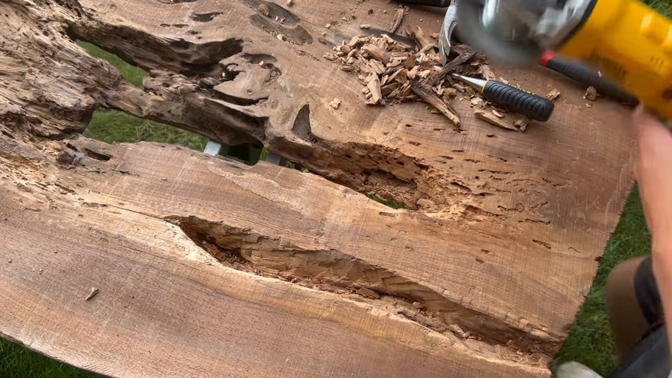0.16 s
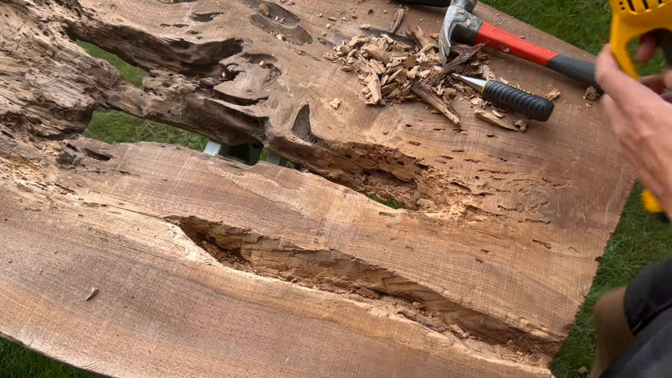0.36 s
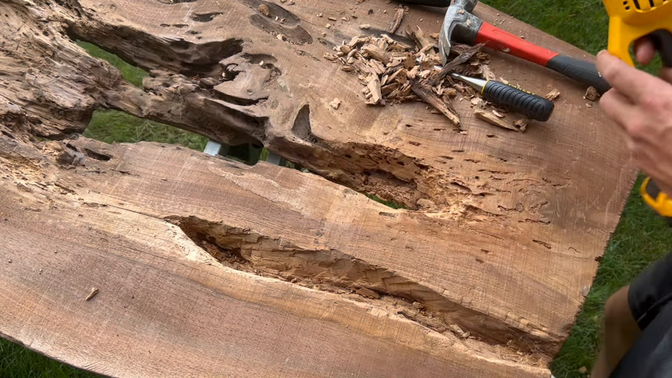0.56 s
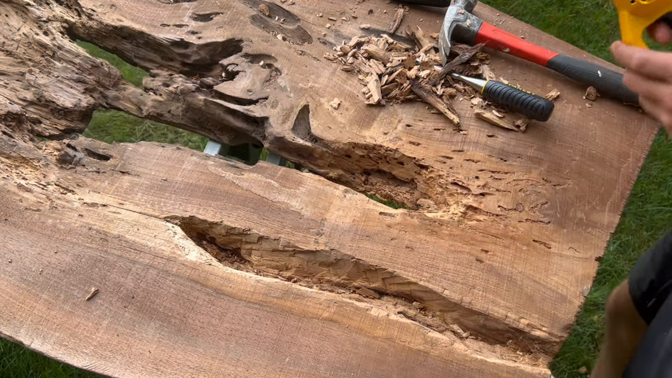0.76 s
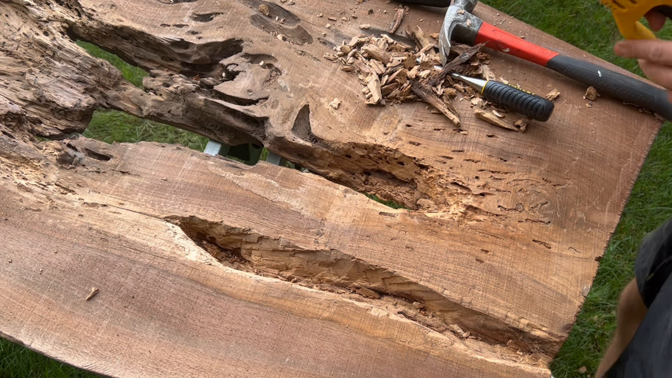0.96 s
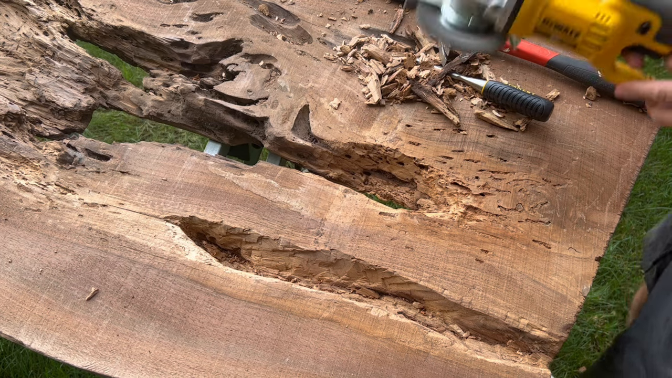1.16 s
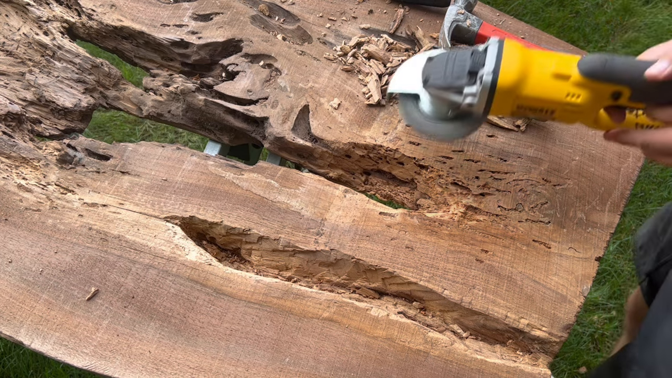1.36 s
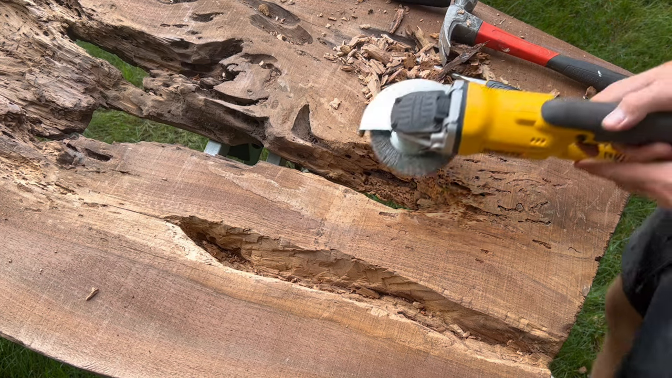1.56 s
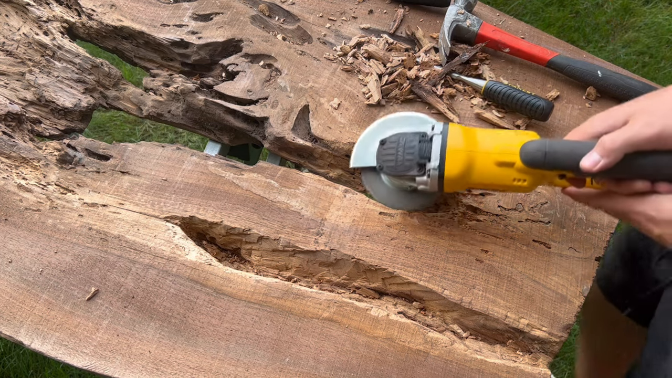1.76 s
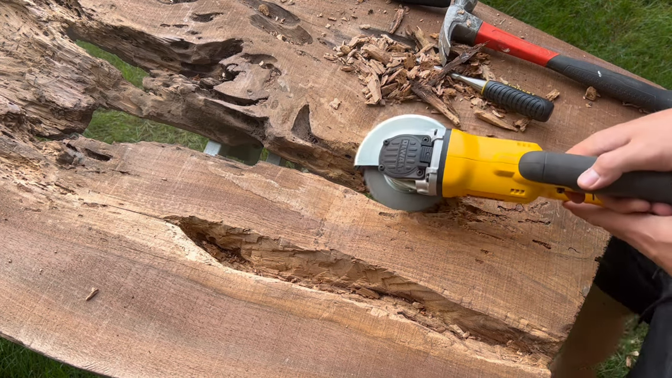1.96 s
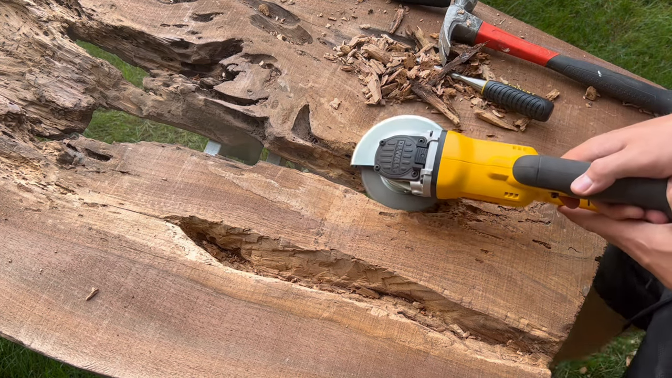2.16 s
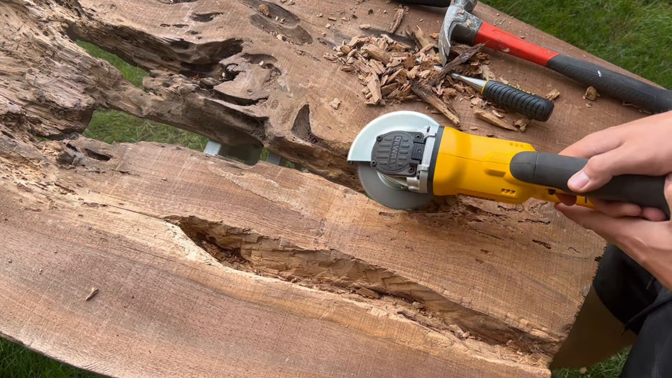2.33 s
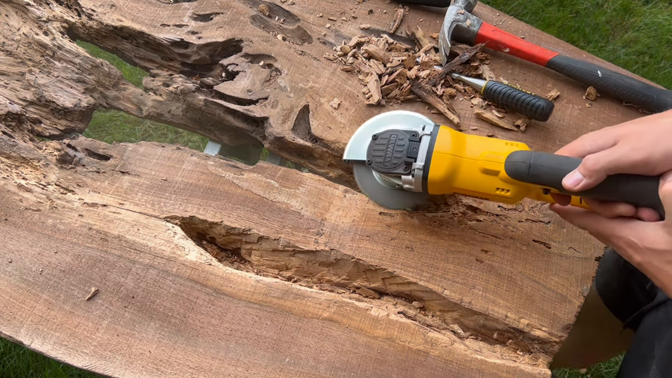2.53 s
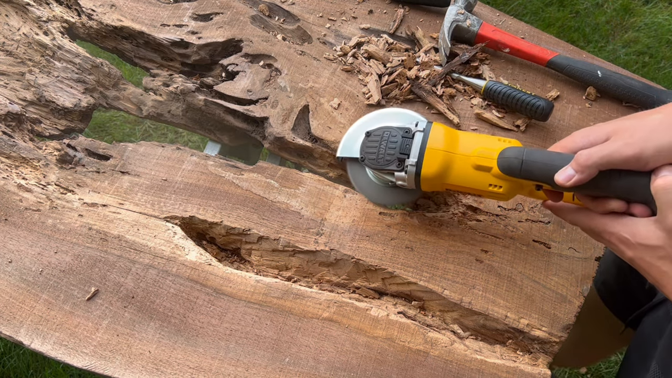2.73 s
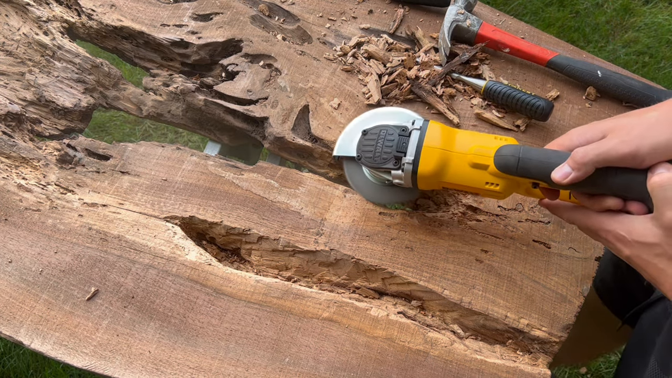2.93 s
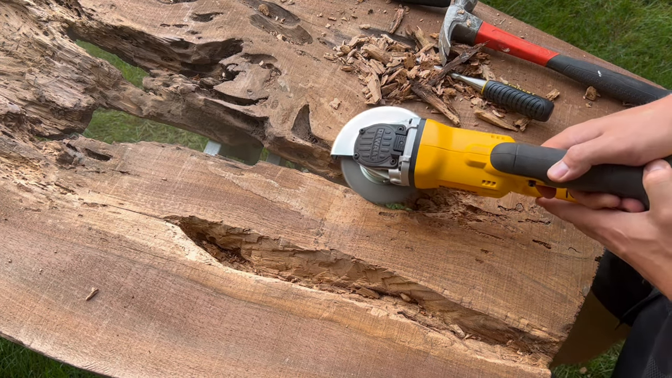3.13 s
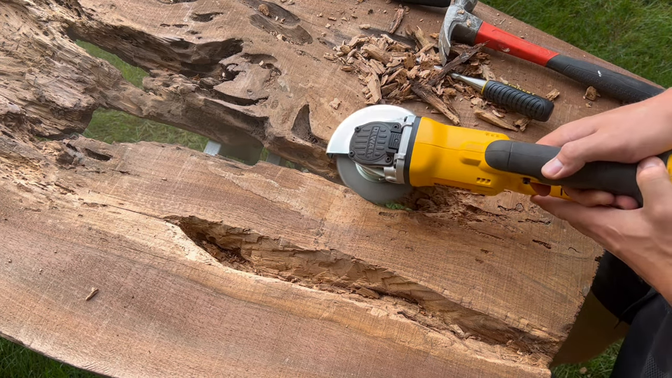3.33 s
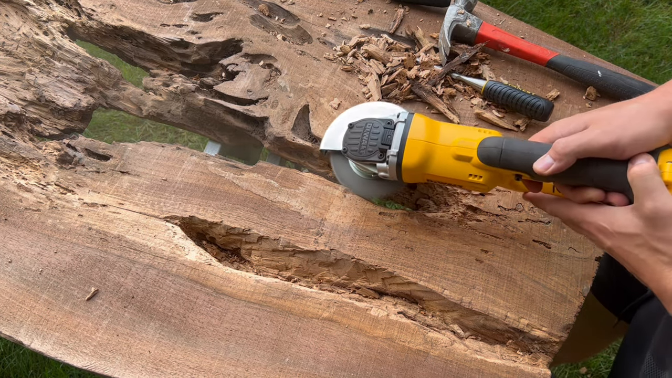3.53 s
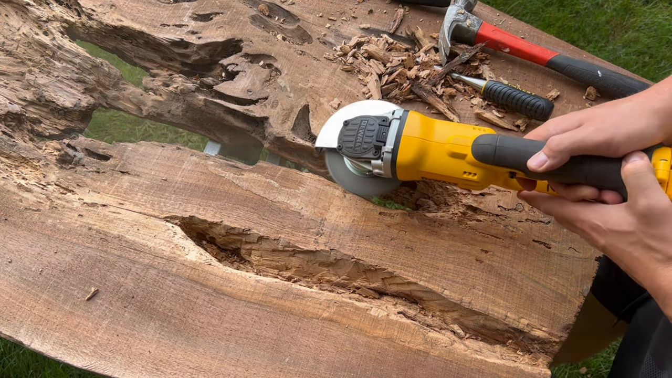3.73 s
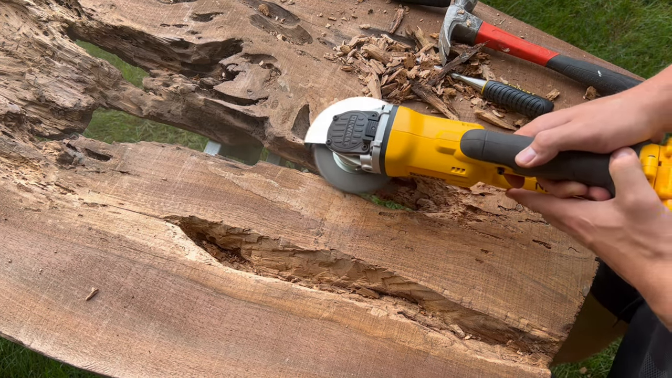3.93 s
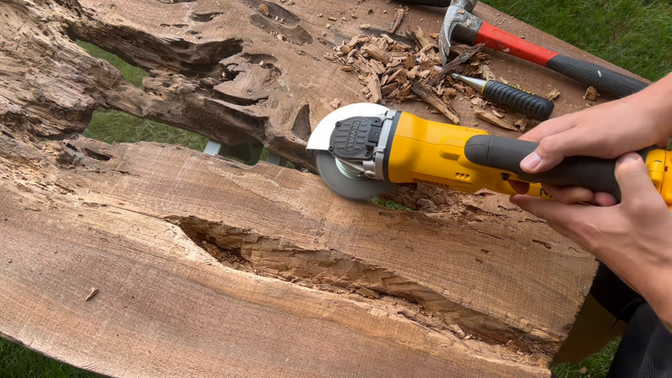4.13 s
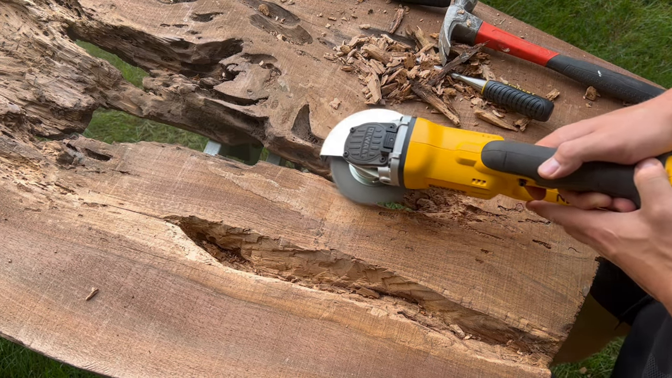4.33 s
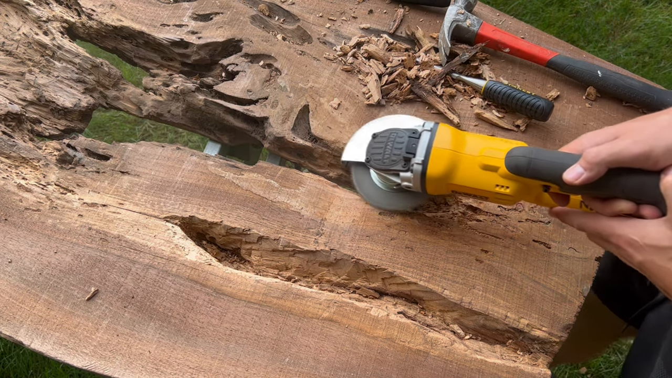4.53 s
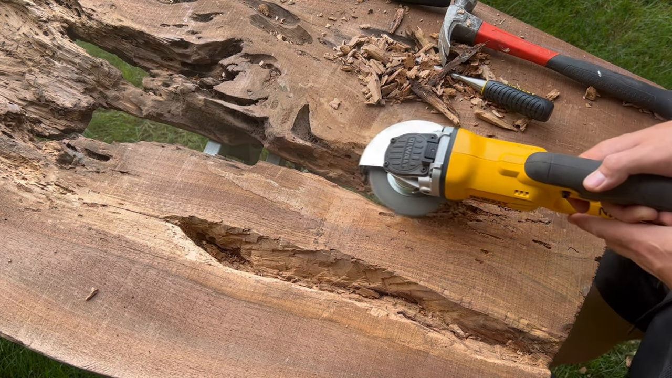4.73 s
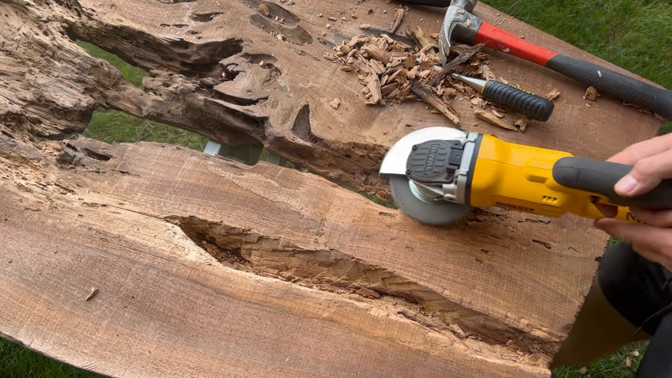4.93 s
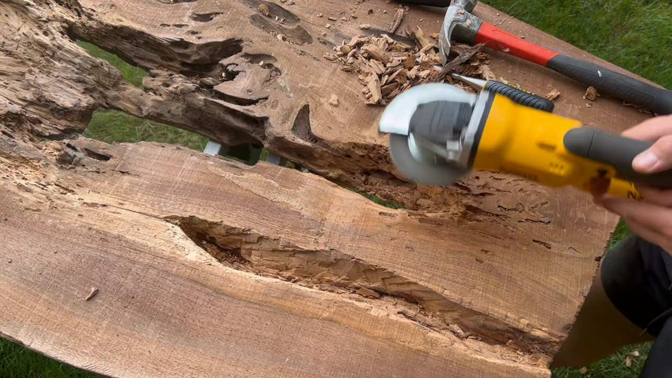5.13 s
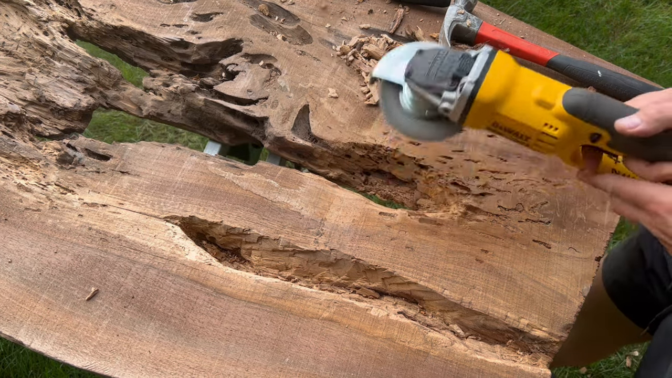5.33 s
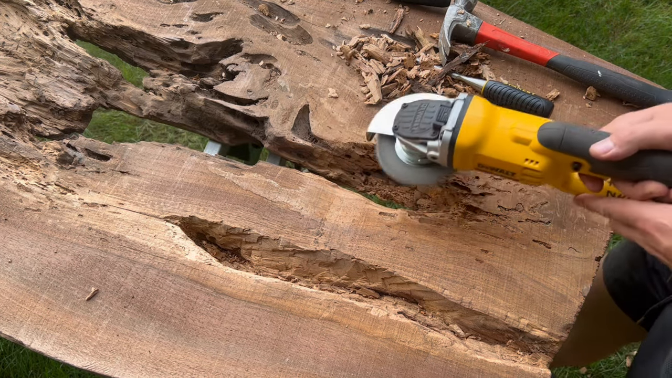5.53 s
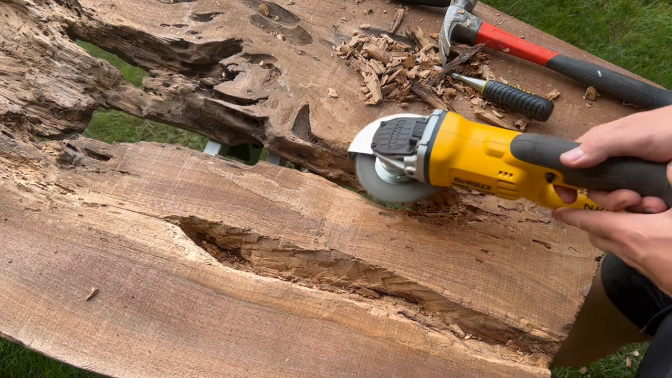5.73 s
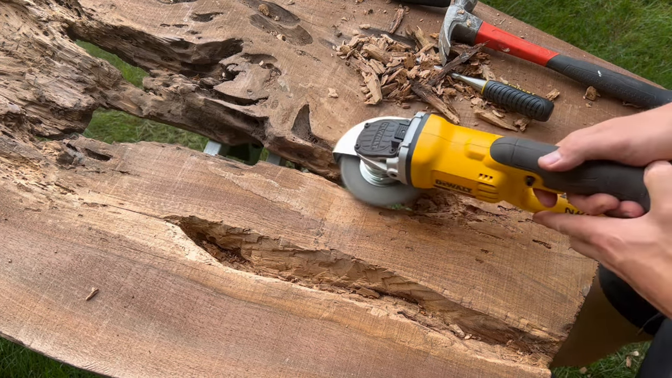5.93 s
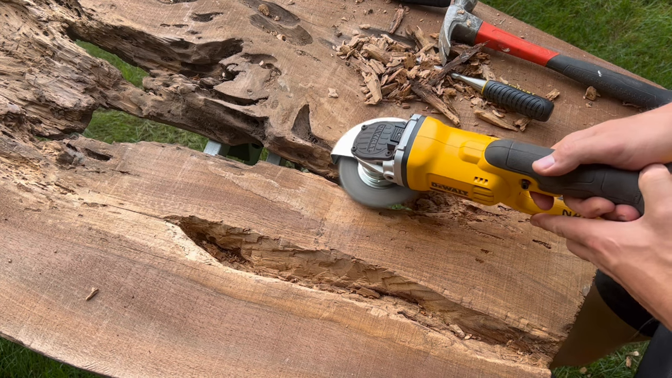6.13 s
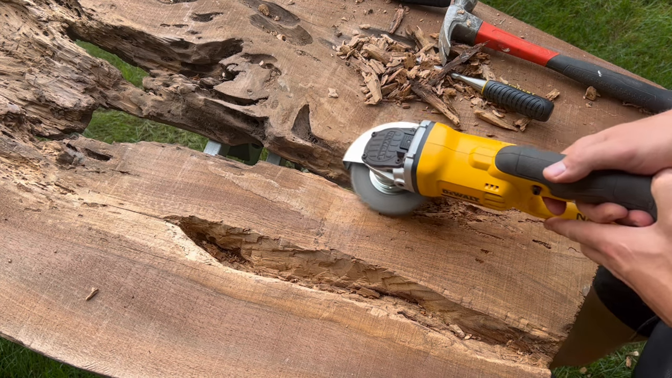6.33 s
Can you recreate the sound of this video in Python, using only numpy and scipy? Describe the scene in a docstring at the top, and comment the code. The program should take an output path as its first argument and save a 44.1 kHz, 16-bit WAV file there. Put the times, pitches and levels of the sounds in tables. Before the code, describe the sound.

A close, dry outdoor stereo pickup with an almost silent garden behind. From 0 to 0.33 s an angle grinder runs freely with a high whine, low hum and airy hiss. The trigger is released and the pitch glides down, gears knocking and rattling unevenly, fading out towards 1.5 s; soft low gusts of air thump the microphone around 0.75-1 s, strongest near 0.87. At 1.62-1.65 s a plastic trigger clicks, and the motor growls up to full whine within about 0.3 s. From 1.9 s it grinds soft wood: throaty roar, gear clatter, hiss and slab rumble, pitch sagging unevenly, deeper near 3.7 s, recovering by 4.2. Around 4.7-5 s a deep bite drags the pitch down with a bright tearing rasp, a brief growl and a final tick. Released at 5.17 s, it winds down with knocks, surges again at 5.53 and runs on to the end at about 6.4 s.

```python
"""Outdoors in a quiet garden, a cordless angle grinder works close to two microphone ports.
It coasts to a stop, its cooling air buffeting the microphone; the trigger clicks and it spins up again,
carves soft rotten wood, sags as the disc bites, is let go for a moment and runs on.
Shaft-locked sines make the whines; filtered noise makes clatter, roar, hiss and rumble;
enveloped bursts make the gear knocks, clicks and gusts. All machine voices follow one motor model."""
import sys
import numpy as np
from scipy import signal
from scipy.fft import rfft, irfft
from scipy.io import wavfile
from scipy.ndimage import uniform_filter1d

SR = 44100
rng = np.random.default_rng(int(sys.argv[2]) if len(sys.argv) > 2 else 0)


def dump(signal):
    """Clip the signal to [-1, 1] and save it as 16-bit WAV at the path in sys.argv[1]."""
    limited = np.clip(np.atleast_2d(signal).T, -1, 1)
    pcm = np.round(limited * 32767).astype(np.int16)
    wavfile.write(sys.argv[1], SR, pcm)


N = 281799
TIME, BINS = np.arange(N) / SR, np.fft.rfftfreq(N, 1 / SR)


def amp(db):
    """Logarithmic level: decibels to amplitude gain."""
    return 10 ** (np.asarray(db) / 20)


def unit(x):
    """Normalisation: scales to rms 1."""
    return x / np.sqrt(np.mean(x ** 2) + 1e-20)


def curve(rows, outside=None):
    """Linear interpolation: a time table, at every sample."""
    return np.interp(TIME, *np.transpose(rows), outside, outside)


def read(points, hz=BINS):
    """Interpolation of a spectrum table on a logarithmic frequency axis."""
    f, value = np.transpose(points)
    return np.interp(np.log(hz + 1), np.log(f), value)


def colour(x, db):
    """Spectral filtering: a gain in dB for every bin, then rms 1."""
    return unit(irfft(rfft(x) * amp(db), N))


def noise():
    """White noise: equal power per hertz."""
    return rng.standard_normal(N)


def wander(hz):
    """Band-limited chance: slow random motion up to about hz; rms 1."""
    points = rng.standard_normal(int(2 * hz * N / SR) + 2)
    return unit(np.interp(TIME * 2 * hz, np.arange(len(points)), points))


def resonate(x, hz, width):
    """Heterodyne resonance: shifts hz to zero, smooths with two poles and shifts back."""
    turn = np.exp(2j * np.pi * np.cumsum(hz) / SR)
    r = np.exp(-np.pi * width / SR)
    smoothed = signal.lfilter([(1 - r) ** 2], [1, -2 * r, r * r], x / turn + 1e-18)
    return 2 * (turn * smoothed).real


def add(mix, s, sound):
    """Superposition: mixes a sound in at time s."""
    part = mix[round(s * SR):][:len(sound)]
    part += sound[:len(part)]


def swell(s, hold_s, rise_db_per_s, fall_db_per_s):
    """Exponential growth and decay: an envelope in dB that rises to 0 at time s, holds, and falls."""
    rise = -rise_db_per_s * np.maximum(s - TIME, 0)
    return rise - fall_db_per_s * np.maximum(TIME - s - hold_s, 0)


def lift(hz, centre, width, db):
    """Resonance curve: the gain in dB at the frequencies hz."""
    return db / (1 + (2 * (hz - centre) / width) ** 2)


# the trigger is held: (start [s], end [s])
RUNS = [(-1, .33), (1.655, 5.17), (5.528, 7)]
# pressure on the wood: (time [s], motor speed lost [turns/s])
SAG = [(1.8, 0), (1.9, 10), (2.11, 13.5), (2.22, 19.5), (2.37, 9.5), (2.5, 20), (2.62, 16), (2.8, 24.5),
       (3.03, 28), (3.54, 29.5), (3.74, 34.5), (3.88, 20.5), (4.2, 12), (4.68, 22), (4.8, 47.5), (4.98, 33),
       (5.16, 3), (6.25, 2), (6.39, 14)]
FREE_HZ, SPIN_UP_S = 388.5, .099  # free speed in turns per second, and time constant of the climb
FRICTION_HZ_PER_S, DRAG_S = 280, 3.7  # bearings and air brake the coasting rotor
UNLOAD_S = 0.17  # time constant: the gears go slack after the trigger is let go


def motor():
    """Rotor inertia: speed climbs exponentially under power, coasts against friction and drag, sags under load."""
    speed, power = np.zeros(N), np.zeros(N)
    brake = FRICTION_HZ_PER_S * DRAG_S
    for on, off in RUNS:
        driven = np.clip(TIME - on, 0, off - on)
        coasted = np.maximum(TIME - off, 0)
        speed_at_start = np.interp(on, TIME, speed)
        climb = FREE_HZ - (FREE_HZ - speed_at_start) * np.exp(-driven / SPIN_UP_S)
        coasting = (climb + brake) * np.exp(-coasted / DRAG_S) - brake
        speed = np.where(TIME < on, speed, coasting)
        power = np.where(TIME < on, power, np.exp(-coasted / UNLOAD_S))
    return np.maximum(speed - curve(SAG), 0), uniform_filter1d(power, size=500)


HARD_PULL_HZ_PER_S = 940  # acceleration that strains the gears


def pull(speed):
    """Angular acceleration as a share of a hard pull; negative while slowing."""
    return uniform_filter1d(np.gradient(speed) * SR, size=400) / HARD_PULL_HZ_PER_S


FULL_LOAD_HZ = 20  # sag that counts as a firm cut
TILT_S, TILT_TAKES_S = 3.76, 0.06  # the grip shifts and the tool stays tilted into the hollow
AWAY_S, AWAY_WIDTH_S, AWAY_DB = 0.65, 0.56, -3  # the tool is swung aside while it coasts


def level(law, speed, power):
    """Power law of speed, in dB, plus the effects of power, load, hard pull and tilt.

    A law is (dB at free speed, dB per doubling of speed, dB added by power, load, hard pull, tilt).
    """
    # power stirs the gears even from rest
    doublings = np.log2(np.maximum(speed / FREE_HZ, 0.22 * power) + 1e-9)
    load = np.tanh(curve(SAG) / FULL_LOAD_HZ)
    strain = np.clip(pull(speed), 0, 1) ** 2
    tilt = np.clip((TIME - TILT_S) / TILT_TAKES_S + .5, 0, 1)
    away_db = AWAY_DB * np.exp(-((TIME - AWAY_S) / AWAY_WIDTH_S) ** 2)
    return law[0] + np.dot(law[1:], [doublings, power, load, strain, tilt]) + away_db


# housing resonances and one dip: (frequency [Hz], width [Hz], lift [dB])
HOUSING = [(2280, 420, 6), (2600, 200, 7), (2810, 170, -9), (3080, 90, 4), (3430, 70, 5), (3715, 160, 5),
           (5980, 110, 6)]


def housing(hz):
    """Forced resonance: the lift in dB that the housing gives a tone sweeping through hz."""
    return sum(lift(hz, *row) for row in HOUSING)


def partials(turns, orders, waver_db, waver_hz, slip):
    """Order locking: lines at multiples of shaft speed waver in level and phase; high ones need speed."""
    out = np.zeros(N)
    speed = np.gradient(turns) * SR
    pace = np.clip(speed / 360, 0, 1)
    for multiple, db in orders:
        multiple = round(multiple * 32) / 32  # the gear ratio is in 32nds
        phase = 2 * np.pi * (multiple * turns + rng.random()) + slip * wander(waver_hz)
        reach = pace ** (4 * (multiple > 12))
        gain = amp(db + housing(multiple * speed) + waver_db * wander(waver_hz))
        out += reach * gain * np.sqrt(2) * np.sin(phase)
    return out


GEAR_RATIO = 9 / 32  # disc turns per motor turn
# rotor hum, with disc sidebands between whole multiples: (multiple of motor speed [1], relative level [dB])
HUM_ORDERS = [(.84, -17), (1, 0), (1.25, -20), (1.28, -13.5), (1.41, -12.5), (1.44, -17), (1.56, -17.5),
              (1.97, -17), (2.25, -13), (2.38, -15), (2.84, -17.5), (5, -13)]
# gear mesh: (multiple of motor speed [1], relative level [dB])
MESH_ORDERS = [(8, -6), (8.72, -9), (9, -.5), (17.44, -9), (18, -4)]
# change in the gear whine: (time [s], added level [dB])
MESH_SWELL = [(1.79, -9), (1.85, -4), (1.89, -14), (2.15, -3), (3.2, -1.5), (4, 1.5), (4.9, 3), (5.2, -10),
              (5.6, -13), (6.1, -9), (6.39, -3)]
# fan blades: (multiple of motor speed [1], relative level [dB])
FAN_ORDERS = [(7, -14), (8, -12), (10, -.5), (12, -9), (19, -4), (19.12, -10), (20, -4.5), (30, -7)]
HUM_LAW = (-58.5, 25, 0, 7, 4.5, -0.5)
DISC_LAW = (-61, 27, -1, 9, -1, -5)
MESH_LAW = (-70, 18, 11, 1, 6, -1.5)
FAN_LAW = (-65.5, 17, 3, 4, 15, 0)
WOBBLE_DB = -70.5  # at free speed
# with no pressure on the disc the shaft runs loose and the fan whine blurs
IDLE_BLUR, BLUR_LOAD_HZ = 1.5, 9  # added waver (dB) and slip (radians); sag in Hz that steadies it
FAN_MASK_DB = 4.5  # the fan whine stays weak until the speed settles


def whine(turns, speed, power):
    """Rotating-machine orders: rotor imbalance hums, disc wobbles and drones, teeth and blades whine."""
    hum = partials(turns, HUM_ORDERS, waver_db=1.03, waver_hz=11, slip=0.19)
    hum *= amp(level(HUM_LAW, speed, power))

    disc_turns = GEAR_RATIO * turns
    swings = sum(np.sin(2 * np.pi * k * disc_turns) / np.sqrt(k) for k in (1, 2))
    wobble = amp(WOBBLE_DB) * (speed / FREE_HZ) ** 2 * swings
    disc = partials(turns, [(4 * GEAR_RATIO, 0)], waver_db=1.5, waver_hz=14.0, slip=0.083)
    disc *= amp(level(DISC_LAW, speed, power))

    mesh = partials(turns, MESH_ORDERS, waver_db=1.0, waver_hz=25.02, slip=0.13)
    mesh *= amp(level(MESH_LAW, speed, power) + curve(MESH_SWELL))

    blur = IDLE_BLUR * (1 - np.tanh(curve(SAG) / BLUR_LOAD_HZ))
    fan = partials(turns, FAN_ORDERS, waver_db=1.5 + blur, waver_hz=18, slip=0.5 + blur)
    mask_db = FAN_MASK_DB * np.clip(4 * pull(speed), 0, 1)
    fan *= amp(level(FAN_LAW, speed, power) - mask_db)
    return hum + wobble + disc + mesh + fan


# how the housing passes the rotor's pole tones: (frequency [Hz], gain [dB])
COG_BODY = [(1200, -10), (2300, -3), (3400, -10), (5200, -17), (6500, -18), (7400, -10), (8600, -7),
            (11000, -60)]
COG_LAW, COG_SLIP = (-56, 5, -2, 0, 5, -9), 1.8  # slip in radians rms


def cogging(speed, power):
    """Source and filter: overtones of the pole rate glide through housing resonances at low speed."""
    turns = np.cumsum(speed) / SR
    tones = np.zeros(N)
    for k in range(20, 60, 10):
        phase = 2 * np.pi * k * turns + COG_SLIP * wander(110)
        tones += amp(read(COG_BODY, k * speed)) * np.sin(phase)
    slow = np.clip((340 - speed) / 40, 0, 1)
    return tones * slow * amp(level(COG_LAW, speed, power))


def throb(turns, rotor_db, disc_db, flutter_db):
    """Amplitude modulation: contact tightens with each turn of rotor and disc, unevenly as the hand shifts."""
    def beats(multiples):
        """Periodic modulation: cosines locked to the shaft."""
        return sum(np.cos(2 * np.pi * (k * turns + rng.random())) for k in multiples)
    rotor = beats([1, 2, 3])
    disc = beats([GEAR_RATIO, 2 * GEAR_RATIO, 1 - 2 * GEAR_RATIO])
    flutter = wander(45) + .5 * wander(8)
    return rotor_db * rotor + disc_db * disc + flutter_db * flutter


def grit(per_s, spread_db):
    """Random impulse train: sparse impacts of uneven size; rms 1."""
    size = amp(spread_db * np.minimum(rng.exponential(1, N), 4))
    sign = rng.choice([-1, 1], N)
    return unit(size * sign * (rng.random(N) < per_s / SR))


# gears running: (frequency [Hz], relative density [dB per Hz])
CLATTER = [(20, -58), (60, -9), (110, -15.5), (300, -2), (480, -3.5), (700, 0.5), (1100, -8), (2750, -3),
           (4400, -6), (5000, -22), (6500, -81)]
# the same gears freewheeling slowly: (frequency [Hz], relative density [dB per Hz])
IDLING = [(260, -38), (450, -6.5), (623, -18.5), (830, -13), (951, -9.5), (1250, -13.5), (1920, -6),
          (2100, -9), (2750, -15), (3050, -13.5), (3500, -18.5), (3850, -7), (4550, -22), (5400, -30),
          (7800, -61), (13200, -120)]
# gear case and guard resonances: (frequency [Hz], width [Hz], lift [dB])
CASE = [(1473, 640, 5.5), (1745, 490, 4), (2960, 870, 0), (3860, 280, 5.5)]
CLATTER_LAW = (-57, 3.5, 5, 2, -1, -1.05)


def clatter(speed, power, throb_db):
    """Impact excitation: teeth and grit rattle case and guard; at low speed the case rings through."""
    case_db = sum(lift(BINS, *row) for row in CASE)
    impacts = (noise() + 0.75 * grit(2500, spread_db=1.0)) * amp(throb_db)
    running = colour(impacts, read(CLATTER) + case_db)
    idling = colour(impacts, read(IDLING))
    slack = np.clip(2 * (1 - speed / FREE_HZ), 0, 1) ** 2
    mixed = running * (1 - slack) + idling * slack
    return mixed * amp(level(CLATTER_LAW, speed, power))


# the steel guard's resonances: (frequency [Hz], width [Hz], relative level [dB])
GUARD_MODES = [(3025, 620, 3), (4060, 400, -1), (5890, 240, 0), (6984, 210, 0.5)]
# their common ring: (time [s], level [dB])
GUARD_RING = [(2.6, -65.5), (3.6, -61.5), (3.95, -61), (4.3, -65.5), (4.85, -60.5), (5.5, -81),
              (5.59, -61.5), (5.9, -61.5), (6.39, -62)]
# the hollow between guard and wood: (time [s], level [dB])
HOLLOW = [(3.4, -68), (4.2, -60.5), (5.05, -73), (5.2, -53.5), (5.45, -66.5), (5.7, -60), (6.39, -62)]
CHURN_LAW = (-57, 14.5, -4, 0, 2, -11)


def guard(speed, power, throb_db):
    """Cavity and plate resonance: churned air roars with speed; the hollow and the steel ring at their own pitch."""
    churn = unit(resonate(noise(), 2.36 * np.maximum(speed, 330), 160))
    churn *= amp(level(CHURN_LAW, speed, power))
    hollow = unit(resonate(noise(), np.full(N, 1330.), 370))
    hollow *= amp(curve(HOLLOW, outside=-120))
    steel = np.zeros(N)
    for hz, width, db in GUARD_MODES:
        moving_hz = hz * (1 + 0.0092 * wander(4.5))
        steel += amp(db) * unit(resonate(noise(), moving_hz, width))
    steel *= amp(curve(GUARD_RING, outside=-120))
    return (churn + hollow + steel) * unit(amp(throb_db))


# air and dust off the rim: (frequency [Hz], relative density [dB per Hz])
RUSH = [(3000, -58), (4600, -2), (5300, -4.5), (6100, -3), (7000, -2.5), (8200, -4.5), (10000, -2),
        (11200, -1), (15000, -3), (15800, -16)]
# tearing wood fibres: (frequency [Hz], relative density [dB per Hz])
TEARING = [(200, -28), (2500, -13), (3150, -7), (4200, -14), (8500, -9), (10200, -2), (10900, 2.5),
           (12000, -1), (15500, -4.5)]
AIR_LAW = (-56, 7, 6, 3, 5, -1)
# the disc's edge tears deep into the wood
BITE_S, BITE_HOLD_S, BITE_DB = 4.69, 0.14, -42.5
BITE_RISE_DB_PER_S, BITE_FALL_DB_PER_S = 117, 45
# the splinter that ends the bite
CHIP_S, CHIP_DB, CHIP_DECAY_S = 4.996, -37, .0008


def rush(speed, power, throb_db):
    """Turbulence and fracture noise: fan air and dust hiss off the rim; a deep bite rasps brightly."""
    air_impacts = noise() + 0.21 * grit(3700, spread_db=8.5)
    air = colour(air_impacts * amp(1.16 * throb_db), read(RUSH))
    air_db = level(AIR_LAW, speed, power)

    tear_impacts = noise() + 0.55 * grit(3300, spread_db=-1)
    tear = colour(tear_impacts * amp(throb_db), read(TEARING))
    bite_db = BITE_DB + swell(BITE_S, BITE_HOLD_S, BITE_RISE_DB_PER_S, BITE_FALL_DB_PER_S)
    bite_db -= 20 * (TIME > CHIP_S)
    # the rasp takes over from the plain hiss while the edge is buried
    masking = np.sqrt(1 + 0.12 * amp(bite_db - air_db) ** 2)
    return air * amp(air_db) / masking + tear * amp(bite_db)


def chip():
    """Brittle fracture: a last splinter breaks off and ticks against the guard."""
    tick = np.exp(-abs(TIME - CHIP_S) / CHIP_DECAY_S)
    return colour(noise(), read(TEARING)) * amp(CHIP_DB) * tick


# reflections off the slab: delays (s), their gain, and the rms share by which the hand varies them
ECHO_S, ECHO_GAIN, ECHO_SWAY = (.0009, .0021), .24, .05


def reflected(x):
    """Comb interference: the slab throws noise back along a path that the hand keeps changing."""
    echoes = sum(np.interp(TIME - s * (1 + ECHO_SWAY * wander(2)), TIME, x) for s in ECHO_S)
    return (x + ECHO_GAIN * echoes) / np.sqrt(1 + len(ECHO_S) * ECHO_GAIN ** 2)


# the slab's rumble under the disc: (frequency [Hz], relative density [dB per Hz])
SLAB = [(15, -48), (32, -21), (55, -7), (100, 1.5), (160, 2), (260, -6.5), (500, -26.5)]
SLAB_LAW = (-88, 0, -2, 23, -19, -4)
# the edge grabs once as it digs in, with a low growl
GRAB_S, GRAB_HOLD_S, GRAB_DB, GRAB_HZ = 4.73, .04, -57, 500


def slab(speed, power, throb_db):
    """Structure-borne sound: the wood rumbles under pressure and growls briefly where the edge grabs."""
    rumble = colour(noise(), read(SLAB)) * amp(level(SLAB_LAW, speed, power))
    grab_db = GRAB_DB + swell(GRAB_S, GRAB_HOLD_S, rise_db_per_s=500, fall_db_per_s=300)
    grab = unit(resonate(noise(), np.full(N, GRAB_HZ), 250)) * amp(grab_db)
    return (rumble + grab) * unit(amp(throb_db))


# the loudest knocks of the freewheeling gears: (time [s], relative level [dB])
KNOCKS = [(0.46, -40), (0.489, -40), (.5145, -44), (0.5377, -42), (0.561, -38.5), (0.585, -42),
          (0.61, -38.5), (.62, -48), (.6275, -43), (0.635, -47), (0.656, -42.5), (0.668, -40), (.677, -47),
          (.693, -47), (0.707, -41), (.7275, -42), (0.738, -45), (0.763, -49), (0.78, -43), (0.803, -44),
          (.8165, -41), (0.835, -40), (0.854, -39), (0.877, -42), (0.894, -42), (.9135, -59), (0.931, -50),
          (0.949, -47), (0.974, -45), (5.276, -39), (5.309, -45), (5.4035, -44), (5.428, -44),
          (5.4405, -43), (5.463, -40.5), (5.4915, -45), (5.501, -39), (5.5135, -49)]
# lesser knocks rattle on at low speed, fainter as the rotor slows
RATTLE_FROM_HZ, RATTLE_TO_HZ = 160, 42
RATTLE_GAP_S, RATTLE_SPREAD_DB = .026, 2  # gap at free speed, before it varies with speed and chance
RATTLE_DB, RATTLE_DB_PER_DOUBLING = -42, 4.8


def rattle(speed):
    """Free-play impacts: rows (time [s], relative level [dB]) as coasting gears bounce at uneven gaps."""
    pace = speed / FREE_HZ + 1e-9
    rate = amp(0.78 * wander(25)) / (RATTLE_GAP_S * np.sqrt(np.maximum(pace, .1)))
    bounces = np.cumsum(rate) / SR
    loose = (pull(speed) < 0) & (speed < RATTLE_FROM_HZ) & (speed > RATTLE_TO_HZ)
    at = np.flatnonzero((np.diff(bounces // 1) > 0) & loose[1:])
    db = RATTLE_DB + RATTLE_DB_PER_DOUBLING * np.log2(pace) + RATTLE_SPREAD_DB * noise()

    def clear(s):
        """Separation: true where no louder knock is near."""
        return min(abs(s - knock_s) for knock_s, _ in KNOCKS) > RATTLE_GAP_S / 2
    return [(TIME[i], db[i]) for i in at if clear(TIME[i])]


# teeth under a hard pull: (multiple of motor speed [1], level [dB])
STRAIN_ORDERS = [(9, -60), (18, -66), (27, -70)]
# where the mesh rate meets this resonance, knocks ring more and crack less: (Hz, width Hz, dB)
KNOCK_BODY = (2480, 600, 2.5)
KNOCK_RING_LAW = (-4.5, 7, -5.5, 11, 5, -7)


def backlash(turns, speed, power):
    """Gear backlash: loose teeth knock in bursts that ring at the mesh rate; hard torque makes them growl."""
    bursts = np.zeros(N)
    u = np.arange(int(.03 * SR)) / SR / 0.0014
    for s, db in [*KNOCKS, *rattle(speed)]:
        add(bursts, s, amp(db) * u * np.exp(1 - u))
    mesh_hz = 9 * speed
    ring = unit(np.sin(2 * np.pi * np.cumsum(mesh_hz) / SR + 0.67 * wander(350)))
    ring *= amp(level(KNOCK_RING_LAW, speed, power))
    crack_db = read([(900, -7), (1600, 4.5), (4600, 10.5), (5600, -10.0), (15000, -6.0)])
    crack = colour(noise(), crack_db)
    tuned = amp(lift(mesh_hz, *KNOCK_BODY))
    knocks = bursts * (ring * tuned + amp(-11.0) * crack / tuned ** 2)

    torque = pull(speed)
    driven = np.clip(torque, 0, 1) ** 2 * np.clip(speed / 240, 0, 1)
    tones = driven * partials(turns, STRAIN_ORDERS, waver_db=3, waver_hz=110, slip=0.75)
    # teeth sing roughly when driven hard, and also while they slow
    strain = .5 * driven + .7 * np.clip(-torque, 0, .4)
    strain *= np.maximum(speed > 150, power)
    song = unit(resonate(noise(), mesh_hz, 230))
    growl_db = level(CLATTER_LAW, speed, power) + 0.3 * housing(mesh_hz) - 8.0
    return knocks + song * strain * amp(growl_db) + tones


# trigger snap, then gears take up: (time [s], relative ring level [dB], relative snap level [dB], pitch factor [1])
CLICKS = [(1.617, -39, -42.5, 0.83), (1.6516, -38.5, -51, 0.45)]
# plastic shell: (frequency before pitch factor [Hz], relative level [dB], t60 before hand damping [s])
SHELL = [(1530, 1, 0.16), (2420, -3, 0.046), (3830, -8, 0.019), (4500, -5, 0.075), (7400, -10, 0.013)]


def trigger():
    """Damped modal ringing: the switch scrapes over and snaps; the hand soon quiets the plastic shell."""
    out = np.zeros(N)
    t = np.arange(int(.06 * SR)) / SR
    grip = np.exp(-t / .004) - np.exp(-t / .0003)
    u = t / .0009
    for s, ring_db, snap_db, pitch in CLICKS:
        ring = np.zeros(len(t))
        for hz, db, t60 in SHELL:
            ring += amp(db - 60 * t / t60) * np.sin(2 * np.pi * (hz * pitch * t + rng.random()))
        envelope = u * np.exp(1 - u) + .14 * np.exp(-t / .012)
        scrape = envelope * rng.standard_normal(len(t))
        band = signal.butter(2, [900 * pitch, 8000], "band", fs=SR)
        add(out, s, amp(ring_db - 10.5) * ring * grip)
        add(out, s - .001, amp(snap_db) * signal.lfilter(*band, scrape))
    return out


# gusts of cooling air: (time [s], thump level [dB], swing [Hz], rumble level [dB], fade [dB per s])
GUSTS = [(0.761, -44, 434, -49.5, 187), (0.874, -31, 279, -43.5, 127), (0.967, -44.5, 255, -50, 93)]
GUST_LEAD_S, GUST_RISE_DB_PER_S = 0.021, 493


def draught():
    """Turbulent pressure: gusts thump within a lumpy rumble that is partly each port's own."""
    shape = read([(20, -32), (55, 6.5), (140, 1.0), (220, -4.0), (400, -18), (700, -37), (2000, -82)])
    own = np.array([colour(noise(), shape), colour(noise(), shape)])
    rumble = colour(noise(), shape) + .17 * own
    thumps, blow = np.zeros(N), np.zeros(N)
    for s, thump_db, hz, rumble_db, fade in GUSTS:
        u = (TIME - s) * hz
        thumps -= amp(thump_db) * np.cos(2 * np.pi * u) * np.exp(-2 * u ** 2)
        gust_db = rumble_db + swell(s - GUST_LEAD_S, GUST_LEAD_S, GUST_RISE_DB_PER_S, fade)
        blow = np.maximum(blow, amp(gust_db))
    return rumble * blow + thumps


# quiet background: (frequency [Hz], relative density [dB per Hz])
GARDEN = [(20, -6), (60, -7.5), (2000, -22), (4000, -26.5)]


def garden():
    """Ambient noise: a faint steady background, the same at both ports."""
    return amp(-88) * colour(noise(), read(GARDEN))


# between the microphone ports: (frequency [Hz], phase by which left leads [radians])
PORT_PHASE = [(20, 0), (500, -.5), (1000, .2), (1550, -1), (2100, 0), (3200, .6), (4800, .1), (6100, -1),
              (6900, 0), (8100, 0), (11100, -6.28), (11650, -6.28), (15300, -12.57)]
# between the microphone ports: (frequency [Hz], left minus right [dB])
PORT_BALANCE = [(400, 0), (650, -6), (1150, 4), (1650, -2), (5600, 0), (6450, 4), (7100, 0)]


def scene():
    """Superposition and two-port pickup: the grinder over a quiet garden."""
    speed, power = motor()
    turns = np.cumsum(speed * (1 + .0005 * wander(20))) / SR
    throb_db = throb(turns, rotor_db=-0.9, disc_db=1.0, flutter_db=0.63)
    state = speed, power, throb_db

    def noises():
        """Broadband radiation: case, guard and rim together."""
        return clatter(*state) + guard(*state) + rush(*state)

    tones = whine(turns, speed, power) + cogging(speed, power)
    contact = reflected(noises()) + slab(*state) + chip()
    knocks = backlash(turns, speed, power) + trigger()
    tool = rfft(tones + contact + knocks)
    # each port takes half the difference, in opposite directions
    port = amp(read(PORT_BALANCE) / 2) * np.exp(.5j * read(PORT_PHASE))
    direct = irfft(np.array([tool * port, tool / port]), N)
    # noise leaves vents, rim and slab at once, so part of it differs between the ports
    spread = amp(read([(200, -21), (600, -12), (7000, -13), (12000, -15)]))
    side = irfft(rfft(noises()) * spread, N)
    return direct + np.array([side, -side]) + draught() + garden()


EDGE_HZ = 15850


def record(dry):
    """Band limiting: the recorder's linear-phase low-pass at its upper edge."""
    lowpass = signal.firwin(511, EDGE_HZ, window=("kaiser", 9), fs=SR)
    return signal.oaconvolve(dry, lowpass[None], "same")


dry = scene()
out = record(dry)
dump(out)
```